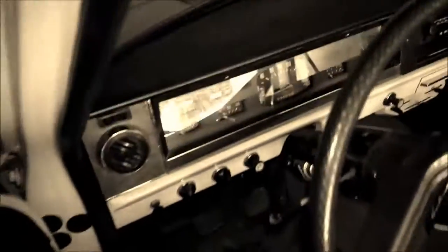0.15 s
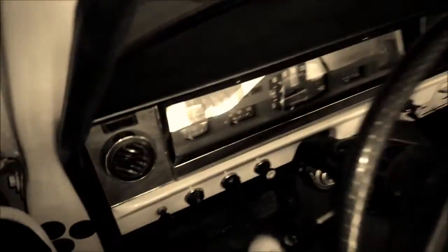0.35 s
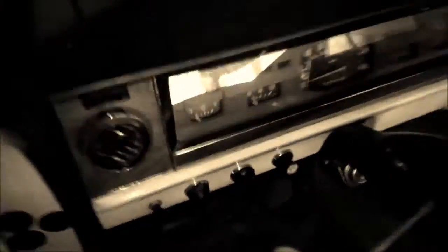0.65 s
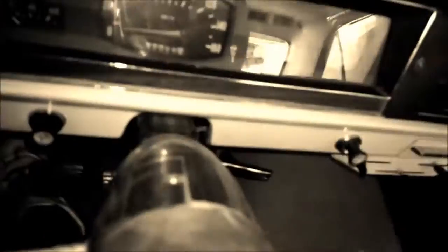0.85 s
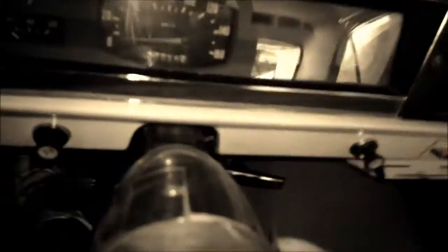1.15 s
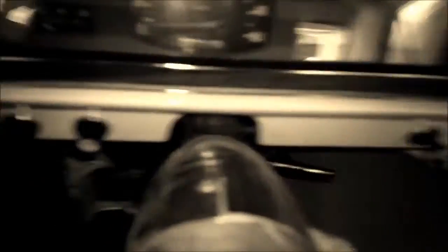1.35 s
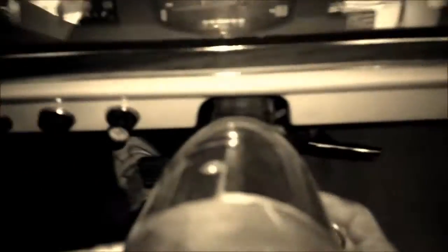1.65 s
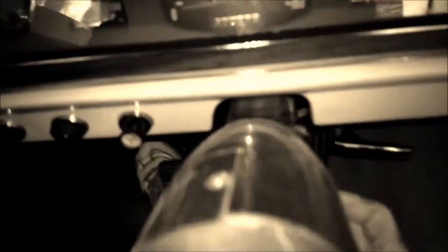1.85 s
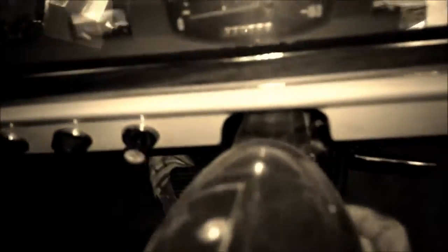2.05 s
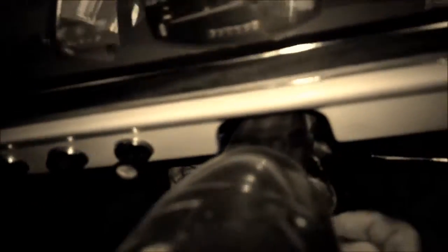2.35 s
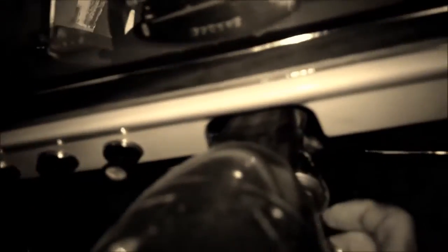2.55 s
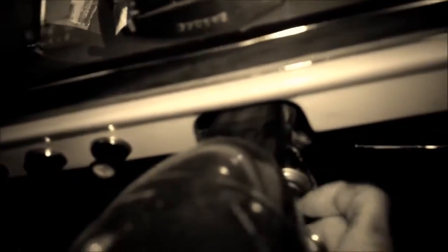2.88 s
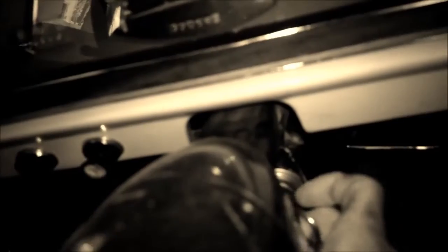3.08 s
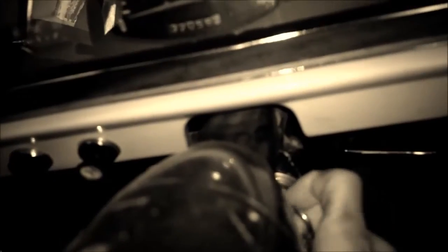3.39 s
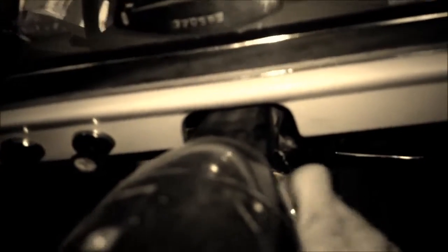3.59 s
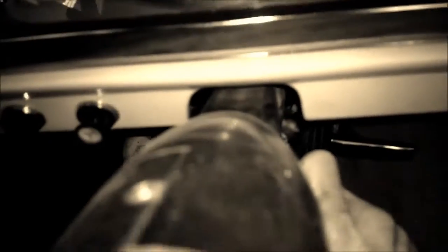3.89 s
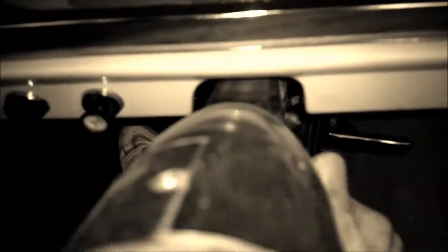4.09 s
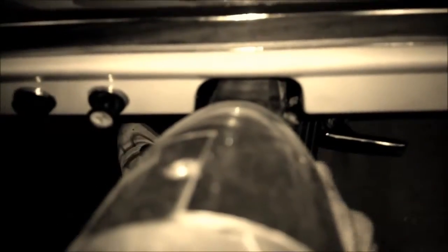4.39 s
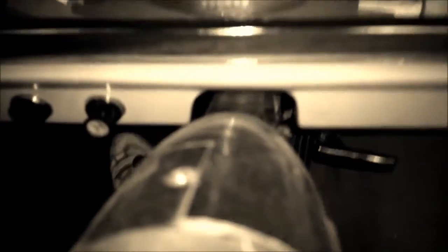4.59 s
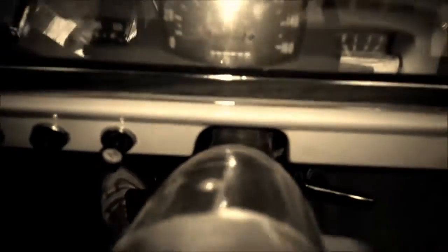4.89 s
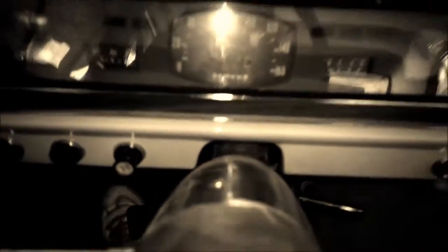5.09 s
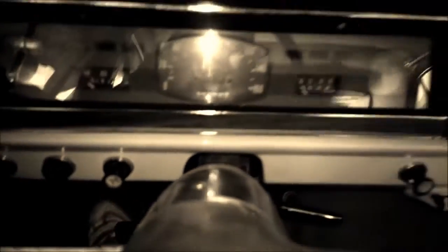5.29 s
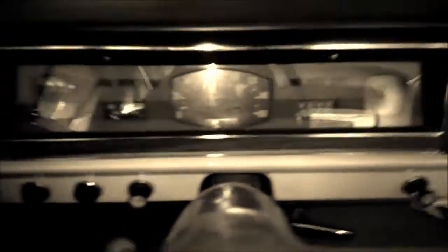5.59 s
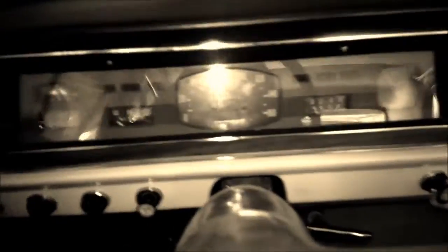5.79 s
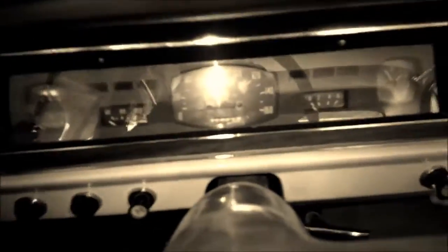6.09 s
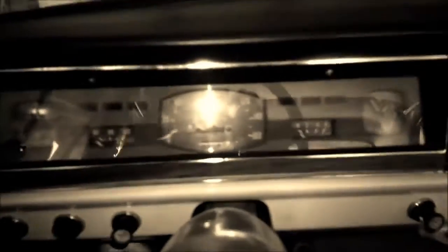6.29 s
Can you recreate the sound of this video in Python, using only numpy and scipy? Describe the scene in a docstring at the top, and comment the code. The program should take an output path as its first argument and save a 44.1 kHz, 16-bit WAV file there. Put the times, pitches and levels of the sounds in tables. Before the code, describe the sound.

Inside a quiet parked car, fingers bump the microphone, a key slides into the ignition with sharp clicks, and keys jingle.

```python
"""Inside a parked car, engine off, heard by a hand-held camera: left port open, right port muffled.
First fingers rub and bump the camera and the background dips briefly; the lens drive ticks faintly.
From 1.3 s a sleeve rustles and a hand finds the ignition key with small metal taps. At 3.4 s the key
slides into the lock, clicking over its pins; the dashboard knocks and the steering column thuds. From
4.5 s the lock clicks again and the hanging keys jangle. At 6 s the camera is rubbed and bumped again."""
import sys
import numpy as np
from scipy import signal
from scipy.fft import rfft, irfft
from scipy.io import wavfile

SR = 44100
rng = np.random.default_rng(int(sys.argv[2]) if len(sys.argv) > 2 else 0)


def int16_out(signal):
    """Quantize to a 16-bit WAV file."""
    q = np.round(np.clip(np.atleast_2d(signal).T, -1, 1) * 32767)
    wavfile.write(sys.argv[1], SR, q.astype(np.int16))


N = 284170
TIME = np.arange(N) / SR
AGE = TIME[:SR // 4]   # seconds since a contact
GRID_HZ = np.maximum(np.fft.rfftfreq(8192, 1 / SR), 1)


def from_db(db):
    """Amplitude ratio of a level in decibels."""
    return 10 ** (np.asarray(db) / 20)


def add(track, start_s, sound):
    """Superposition: a sound joins the track at its start time."""
    start = max(round(start_s * SR), 0)
    track[..., start:start + sound.shape[-1]] += sound[..., :N - start]


def resonance_db(centre_hz, width_hz, peak_db):
    """Resonance: a bell-shaped peak in a spectrum."""
    return peak_db / (1 + (2 * (GRID_HZ - centre_hz) / width_hz) ** 2)


def response_db(spectrum, modes=()):
    """Frequency response: a broad spectrum with resonances standing on it."""
    hz, db = np.transpose(spectrum)
    return np.interp(np.log(GRID_HZ), np.log(hz), db) + sum(resonance_db(*mode) for mode in modes)


def contact_db(body_db, tilt_db_per_octave, ring_hz, ring_width_hz, ring_db):
    """Impact spectrum: a harder contact is brighter, and the struck part resonates."""
    brightness_db = tilt_db_per_octave * np.log2(np.maximum(GRID_HZ, 1500))
    return body_db + brightness_db + resonance_db(ring_hz, ring_width_hz, ring_db)


def impulse(gain_db):
    """Minimum phase: folding the cepstrum gives a causal impulse response."""
    cepstrum = irfft(np.log(from_db(gain_db)))
    half = len(cepstrum) // 2
    cepstrum[1:half] *= 2
    cepstrum[half + 1:] = 0
    return irfft(np.exp(rfft(cepstrum)))[:half]


def colour(source, shape_db):
    """Convolution at unit energy: white noise takes the spectral shape and keeps its power."""
    response = impulse(shape_db)
    return signal.oaconvolve(source, response / np.linalg.norm(response))[:len(source)]


def noise(spectrum):
    """Stationary noise of rms 1 with the given spectral shape."""
    return colour(rng.standard_normal(N + SR), response_db(spectrum))[SR:]


def friction(spectrum, grain_db, grains_per_s):
    """Stick-slip friction: noise that comes in grains of bounded strength."""
    knots = np.sqrt(3) * rng.uniform(-1, 1, N)   # unit variance
    grain = from_db(grain_db * np.interp(TIME * grains_per_s, np.arange(N), knots))
    excitation = rng.standard_normal(N) * grain / np.sqrt(np.mean(grain ** 2))
    return colour(excitation, response_db(spectrum))


def burst(decay_s, tail_db, tail_s, rise_s):
    """Exponential decay: a spray of tiny contacts, then the padded cabin's short reverberation."""
    envelope = np.hypot(np.exp(-AGE / decay_s), from_db(tail_db) * np.exp(-AGE / tail_s))
    return rng.standard_normal(len(AGE)) * envelope * (1 - np.exp(-AGE / rise_s))


def stroke(start_s, hold_s, level_db, rise_db_per_s, fall_db_per_s):
    """Envelope of one movement: it swells up to its start time, holds and fades."""
    early_s = np.maximum(start_s - TIME, 0)
    late_s = np.maximum(TIME - start_s - hold_s, 0)
    return from_db(np.maximum(level_db - rise_db_per_s * early_s - fall_db_per_s * late_s, -200))


def strokes(rows, rise_db_per_s, fall_db_per_s):
    """Incoherent addition: the envelopes of several movements sum in power."""
    return np.sqrt(sum(stroke(*row, rise_db_per_s, fall_db_per_s) ** 2 for row in rows))


# right port relative to left: frequency_hz, gain_db
MUFFLED_PORT = [(30, 4.5), (200, -1), (450, 3.5), (750, 6), (1200, -5), (2000, -31.5), (3000, -39),
                (6000, -40.5), (9000, -45), (16000, -38)]

def ports(sound, lag_s=0.00045):
    """Delay and filtering: cabin sound reaches the right port late and dull."""
    dull = signal.oaconvolve(sound, impulse(response_db(MUFFLED_PORT)))[:N]
    return np.array([sound, np.interp(TIME - lag_s, TIME, dull)])


# murmur's bass and middle, hum, microphone hiss: frequency_hz, relative_db
BASS_SPECTRUM = [(12, -36), (20, -2), (64, 1), (91, 2.5), (124, 1), (242, -8.5), (300, -10), (390, -26),
                 (660, -120)]
MIDDLE_SPECTRUM = [(120, -7), (280, -1), (450, -3), (750, -6.5), (1300, -17.5), (2200, -21), (5000, -45.5),
                   (16000, -62)]
HUM_SPECTRUM = [(100, -45.5), (255, -22), (282, -3), (310, -18), (800, -54.5)]
HISS_SPECTRUM = [(500, -7), (1400, -5), (2000, -4.5), (2700, -6.5), (3600, -5.5), (5500, -7.5), (7500, -12),
                 (16000, -11)]
# bass swells as the driver moves, and spells of faint hum: start_s, hold_s, level_db
SWELLS = [(3.22, 0.11, -66), (3.55, 0.096, -55.5), (4.6, 0.039, -55), (5.1, 0.32, -61.5),
          (5.72, 0.033, -58.5)]
HUMS = [(1.36, 0.14, -69.5), (5.08, 0.37, -70)]

def cabin(bass_db=-66.5, middle_db=-71.5, hiss_db=-73.5):
    """Ambient noise: both ports share the bass and hum; middle and hiss are uncorrelated."""
    slopes = dict(rise_db_per_s=108, fall_db_per_s=97.5)
    bass_gain = np.hypot(from_db(bass_db), strokes(SWELLS, **slopes))
    bass = bass_gain * friction(BASS_SPECTRUM, grain_db=1.5, grains_per_s=12)
    hum = strokes(HUMS, **slopes) * noise(HUM_SPECTRUM)
    diffuse = [from_db(middle_db) * noise(MIDDLE_SPECTRUM) + from_db(hiss_db) * noise(HISS_SPECTRUM)
               for side in range(2)]
    return ports(bass + hum) + np.array(diffuse)


# rubbing cloth: frequency_hz, relative_db
SLEEVE_SPECTRUM = [(470, -25.5), (800, -17), (1000, -10.5), (1300, -10), (3260, -12.5), (4030, -13.5),
                   (6330, -14.5), (9690, -21.5), (15000, -28.5), (16000, -32)]
# arm movements: start_s, hold_s, level_db, tilt_db_per_octave
RUSTLES = [(1.285, 0.39, -66.5, 1.5), (1.771, 0.094, -66, -6.5), (2.018, 0.076, -67.5, -2),
           (2.17, 0.15, -69, 0), (2.664, 0.28, -72, -1), (2.964, 0.47, -70.5, 0), (3.68, 0.21, -64, 0),
           (4.1, 0.052, -70.5, -5.5), (4.45, 0.83, -70.5, -0.5), (5.148, 0.27, -63.5, 1),
           (5.676, 0.21, -69.5, 0), (5.978, 0.57, -63, -2.5)]

def sleeve():
    """Cloth friction: each move of the arm rustles, heard at the open port only."""
    left = np.zeros(N)
    for start_s, hold_s, level_db, tilt in RUSTLES:
        spectrum = [(hz, db + tilt * np.log2(hz)) for hz, db in SLEEVE_SPECTRUM]
        cloth = friction(spectrum, grain_db=2, grains_per_s=70)
        left += stroke(start_s, hold_s, level_db, rise_db_per_s=130, fall_db_per_s=118) * cloth
    return np.array([left, np.zeros(N)])


# runs of the lens drive: start_s, step_count, right_peak_db
LENS_RUNS = [(0.592, 2, -52.5), (1.302, 1, -53), (1.526, 2, -55), (1.932, 1, -53.5), (2.094, 1, -50.5),
             (2.430, 3, -49), (2.895, 2, -48.5), (2.969, 1, -49), (3.126, 3, -49), (3.528, 5, -48),
             (5.225, 2, -51.5), (5.460, 4, -56.5)]

def lens_ticks(step_s=0.1, tick_hz=720, peak_s=0.0034, scatter_db=1.0, left_db=-14):
    """Transient response: each step of the lens drive swings the camera case for a few cycles."""
    out = np.zeros(N)
    for start_s, count, peak_db in LENS_RUNS:
        for step in range(round(count)):
            pitch, length, strength = rng.standard_normal(3)
            age = AGE / (peak_s * np.exp(0.15 * length))
            envelope = (age * np.exp(1 - age)) ** 2
            tick = envelope * np.sin(2 * np.pi * tick_hz * (1 + 0.02 * pitch) * AGE)
            add(out, start_s + step * step_s, from_db(peak_db + scatter_db * strength) * tick)
    return out * from_db([[left_db], [0]])


# rumble of the camera case: frequency_hz, relative_db
GRIP_SPECTRUM = [(12, -0.5), (28, 2), (70, 5), (130, -17), (250, -25), (600, -45.5), (2000, -62.5),
                 (16000, -89)]
# shifts of the grip: start_s, hold_s, right_db, left_minus_right_db
GRIPS = [(0.0, 0.072, -40, 5.5), (0.102, 0.13, -36, -7.5), (0.289, 0.049, -42.5, -15),
         (0.473, 0.38, -48, -12.5), (0.78, 0.035, -34.5, -18.5), (5.974, 0.26, -50, -14),
         (6.387, 0.03, -37.5, -20)]

def grip():
    """Structure-borne sound: the shifting grip rumbles through the case, mostly on the right."""
    left = [(start_s, hold_s, db + pan_db) for start_s, hold_s, db, pan_db in GRIPS]
    right = [(start_s, hold_s, db) for start_s, hold_s, db, _ in GRIPS]
    gains = [strokes(side, rise_db_per_s=409, fall_db_per_s=191.5) for side in (left, right)]
    return np.array(gains) * noise(GRIP_SPECTRUM)


# hiss and sizzle of sliding skin: frequency_hz, relative_db
SLIDE_SPECTRUM = [(300, -10), (800, -7.5), (1600, -5.5), (3000, -5), (5000, -1), (7300, -1.5),
                  (9500, -11.5), (12000, -18.5), (16000, -20)]
SIZZLE_SPECTRUM = [(1000, -24.5), (5000, -5.5), (9000, 0), (11000, 0), (14500, 1), (16000, -2)]
# slides by the left port: start_s, hold_s, hiss_db, sizzle_db
SLIDES = [(0.0, 0.8, -67, -80), (0.187, 0.07, -53, -48), (0.792, 0.09, -51.5, -55.5)]

def slide(end_s=0.868, rise_db_per_s=121, fall_db_per_s=47, steepness=1.73):
    """Sliding friction: skin hisses by the open port; its sizzle grows more steeply with speed."""
    hiss_rows = [(start_s, hold_s, db) for start_s, hold_s, db, _ in SLIDES]
    sizzle_rows = [(start_s, hold_s, db) for start_s, hold_s, _, db in SLIDES]
    hiss = strokes(hiss_rows, rise_db_per_s, fall_db_per_s)
    hiss *= friction(SLIDE_SPECTRUM, grain_db=2.1, grains_per_s=1400)
    sizzle = strokes(sizzle_rows, steepness * rise_db_per_s, steepness * fall_db_per_s)
    sizzle *= noise(SIZZLE_SPECTRUM)
    return np.array([(hiss + sizzle) * (TIME < end_s), np.zeros(N)])


# finger drag at each port: frequency_hz, relative_db
DRAG_LEFT_SPECTRUM = [(60, -5), (150, -8), (400, 3), (900, -2.5), (1500, -12), (2200, -4), (4500, -10.5),
                      (7000, -18), (9500, -27.5), (12000, -21.5), (15500, -19.5)]
DRAG_RIGHT_SPECTRUM = [(60, 2), (150, 4.5), (400, -8), (780, 1), (1200, -21), (2200, -26.5), (4000, -40.5),
                       (8000, -68), (16000, -42.5)]
# jerks of the finger: start_s, hold_s, left_db
SLIPS = [(0.868, 0.003, -25.5), (0.883, 0.0035, -26.5), (0.911, 0.015, -30)]

def drag(lift_s=0.93, lift_db=-10.5, right_gain_db=4.5):
    """Stick-slip motion: a finger jerks across both ports; the level drops as it lifts off."""
    gain = strokes(SLIPS, rise_db_per_s=14000.5, fall_db_per_s=477) * from_db(lift_db * (TIME > lift_s))
    left = friction(DRAG_LEFT_SPECTRUM, grain_db=2.5, grains_per_s=700)
    right = from_db(right_gain_db) * friction(DRAG_RIGHT_SPECTRUM, grain_db=5, grains_per_s=600)
    return gain * np.array([left, right])


# skin on the right port: frequency_hz, relative_db
RUB_SPECTRUM = [(150, -6), (450, -8.5), (700, -3), (1000, -6.5), (1300, -12.5), (2000, -16), (2900, -38),
                (4500, -37.5), (7000, -49), (16000, -50)]
# rubs: start_s, hold_s, right_db
RUBS = [(6.0, 0.078, -61), (6.158, 0.057, -46), (6.285, 0.096, -46), (6.312, 0.011, -38.5),
        (6.43, 0.02, -41)]

def rub(left_db=-26):
    """Skin friction: a dull rasp at the muffled port, faint at the open one."""
    rasp = friction(RUB_SPECTRUM, grain_db=2.5, grains_per_s=350)
    return strokes(RUBS, rise_db_per_s=601, fall_db_per_s=550) * rasp * from_db([[left_db], [0]])


def dip(start_s=0.93, fall_s=0.044, hold_s=0.059, recovery_s=0.093, depth_db=-32):
    """Amplitude envelope: after the drag the background drops away briefly and creeps back."""
    age = TIME - start_s
    fall = np.clip(age / fall_s, 0, 1)
    release = np.exp(-np.maximum(age - hold_s, 0) / recovery_s)
    return from_db(depth_db * fall * release)


# fingers bumping the camera: start_s, right_gain_db, settled_pitch_hz, decay_s, left_minus_right_db
BUMPS = [(0.016, -41, 115, 0.063, 0.5), (0.4414, -39, 90, 0.0034, -20), (0.781, -7.5, 39.8, 0.0036, -35),
         (.8682, -19.5, 565, 0.0028, -3.5), (0.8817, -14.5, 122.6, 0.0083, -1.5),
         (0.9105, -11, 127, 0.0051, 1.5), (6.01, -32, 59.7, 0.013, -13), (6.030, -13.5, 60.7, 0.014, -25),
         (6.037, -32, 556, 0.0043, -27), (6.132, -32, 41, 0.025, -23), (6.142, -41.5, 976, 0.015, -33),
         (6.156, -29.5, 43.4, 0.032, -32), (6.2891, -8.5, 67, 0.0047, -32), (6.29, -34, 623, 0.0068, -34),
         (6.3755, -35, 716, 0.014, -28), (6.399, -20.5, 329, 0.004, -40)]

def bumps(stiffness=2.9, settle_s=0.00078, rise_s=0.00073):
    """Damped oscillation: a fingertip lands stiffly and yields, so the pressure swing slows."""
    out = np.zeros((2, N))
    for start_s, db, pitch_hz, decay_s, pan_db in BUMPS:
        cycles = pitch_hz * (AGE + stiffness * settle_s * (1 - np.exp(-AGE / settle_s)))
        envelope = np.exp(-AGE / decay_s) * (1 - np.exp(-AGE / rise_s))
        swing = -np.sin(2 * np.pi * cycles) * envelope
        add(out, start_s, swing * from_db([[db + pan_db], [db]]))
    return out


# hollow column shroud: frequency_hz, relative_db
SCUFF_SPECTRUM = [(60, -22), (200, 0), (350, -2), (580, -0.5), (800, -12), (1100, -21), (1600, -27),
                  (3000, -39), (16000, -86)]
# hand scuffing the shroud: start_s, right_db, decay_s, left_minus_right_db
SCUFFS = [(1.806, -53, 0.043, -13), (1.838, -49, 0.038, -25), (2.075, -51.5, 0.017, -21),
          (4.045, -61.5, 0.07, -1.5), (4.233, -45.5, 0.022, -11), (4.530, -61, 0.056, 12.5),
          (4.773, -54.5, 0.024, 4), (5.375, -53.5, 0.021, 3.5), (5.68, -58, 0.051, -4)]

def scuffs():
    """Diffuse field: hollow scuffs fill the footwell and reach each port by paths of their own."""
    out, shroud_db = np.zeros((2, N)), response_db(SCUFF_SPECTRUM)
    for start_s, db, decay_s, pan_db in SCUFFS:
        sides = [colour(burst(decay_s, tail_db=-35, tail_s=0.037, rise_s=0.002), shroud_db)
                 for side in range(2)]
        add(out, start_s, from_db([[db + pan_db], [db]]) * sides)
    return out


# thuds of the steering column: start_s, peak_db, pitch_hz
THUDS = [(1.236, -53, 148.6), (2.281, -57.5, 65), (3.215, -55.5, 70), (3.429, -43, 86.5),
         (3.479, -27.5, 63), (3.482, -34.5, 135.5), (3.504, -27, 120.5), (3.536, -32.5, 128),
         (3.582, -34, 58), (4.233, -36.5, 110), (4.577, -46.5, 74), (5.949, -43.5, 66)]

def column(cycles_to_peak=1.3):
    """Damped vibration: shaken by the hand, the heavy column swells and fades, slower at low pitch."""
    out = np.zeros(N)
    for start_s, peak_db, pitch_hz in THUDS:
        age = AGE * pitch_hz / cycles_to_peak
        envelope = (age * np.exp(1 - age)) ** 1.2
        add(out, start_s, from_db(peak_db) * envelope * np.sin(2 * np.pi * pitch_hz * AGE))
    return out


# tapped metal: frequency_hz, relative_db
TAP_SPECTRUM = [(200, -11), (1500, -10.5), (2400, -21), (3800, -10), (6000, -7), (8500, -12),
                (11000, -19.5), (16000, -24.5)]
# its resonances: centre_hz, width_hz, peak_db
TAP_MODES = [(2930, 120, 15.5), (3940, 470, 12), (4740, 380, 4), (7800, 640, 4.5)]
# key and fingers tapping about the lock: start_s, level_db, decay_s, tilt_db_per_octave, ring_hz
TAPS = [(1.408, -57.5, 0.014, 5.5, 3870), (1.633, -35, 0.0041, 4, 4640), (1.658, -56.5, 0.017, -6, 7850),
        (1.77, -50.5, 0.012, 2, 3370), (1.831, -46.5, 0.0043, -1, 2950), (1.837, -42, 0.013, -1.5, 3220),
        (2.055, -43, 0.012, -2, 3960), (2.077, -48.5, 0.011, -1, 7100), (2.252, -58.5, 0.012, 7, 5200),
        (2.27, -49, 0.0072, 18, 6450), (2.285, -57, 0.022, 7.5, 5700), (2.61, -66, 0.009, 4, 3500),
        (2.873, -60, 0.012, -5, 3880), (3.581, -59, 0.018, 0, 2760), (4.123, -58, 0.006, -7.5, 3200),
        (5.872, -55, 0.0073, -4, 3400)]

def taps():
    """Damped impacts: the metal rings only briefly while the fingers hold the key."""
    out, body_db = np.zeros(N), response_db(TAP_SPECTRUM, TAP_MODES)
    for start_s, level_db, decay_s, tilt, ring_hz in TAPS:
        spray = burst(decay_s, tail_db=-19, tail_s=0.015, rise_s=0.00015)
        tap = colour(spray, contact_db(body_db, tilt, ring_hz, ring_width_hz=520, ring_db=9.5))
        add(out, start_s, from_db(level_db) * tap)
    return out


# key blade on the lock: frequency_hz, relative_db
SCRAPE_SPECTRUM = [(1200, -34.5), (2000, 10), (2800, 0), (4000, -5.5), (16000, -19)]
# scrapes: start_s, hold_s, level_db
SCRAPES = [(3.423, 0.035, -51), (3.465, 0.04, -43)]

def blade():
    """Sliding friction: the key blade rasps between the pins, harder as it goes in."""
    gain = strokes(SCRAPES, rise_db_per_s=1498.5, fall_db_per_s=506)
    return gain * friction(SCRAPE_SPECTRUM, grain_db=0, grains_per_s=600)


# natural modes of the keys, and their scratch on each other: frequency_hz, relative_db
KEY_MODES = [(3700, -9.5), (5615, -8.5), (6783, -2.5), (6960, -12), (7682, -11), (8242, -2), (9324, -2.5),
             (10487, 2.5), (11558, 0.5), (11630, 0), (12060, 6.5), (12290, -17.5), (12845, 6), (14490, -6),
             (15665, -1.5)]
SCRATCH_SPECTRUM = [(300, -48), (2000, -1.5), (5000, -6), (7000, 3), (9500, -9), (12000, -3), (14000, -7),
                    (16000, 4.5)]
# hanging keys touching: start_s, level_db, struck_hz, t60_s, scratch_relative_db
JINGLES = [(4.558, -34.5, 10490, 0.1, -3), (4.8955, -32.5, 9324, 0.086, -7.5),
           (4.917, -39.5, 12060, 0.04, -17), (4.9362, -29.5, 12060, 0.03, -20),
           (5.141, -43, 8240, 0.096, 3), (5.154, -42.5, 11600, 0.09, -1), (5.258, -46, 12300, 0.17, 7),
           (5.273, -44, 9324, 0.18, -1), (5.331, -34.5, 11600, 0.063, -6), (5.341, -37.5, 10490, 0.11, -20),
           (5.374, -37.5, 11600, 0.074, -22), (5.388, -33, 12845, 0.086, -32),
           (5.433, -49.5, 11600, 0.059, -4), (5.51, -56, 11600, 0.059, -10)]

def keys(focus_hz=260, others_db=-9, scatter_db=3, detune=0.011, rebound_s=0.0049, rebound_db=-5):
    """Modal vibration: a touch scratches briefly and rings all keys, the struck one most."""
    out, scratch_shape_db = np.zeros(N), response_db(SCRATCH_SPECTRUM)
    mode_hz, mode_db = np.transpose(KEY_MODES)[:, :, None]
    attack = 1 - np.exp(-AGE / 0.0006)
    for start_s, level_db, struck_hz, t60_s, scratch_db in JINGLES:
        chance, pitch, phase = rng.standard_normal((3, len(mode_hz), 1))
        struck = np.exp(-((mode_hz - struck_hz) / focus_hz) ** 2)
        strength = from_db(mode_db + (others_db + scatter_db * chance) * (0.5 - struck))
        # loosely touching keys pull each other slightly out of tune
        detuned_hz = mode_hz * (1 + detune * pitch * (1 - struck))
        partials = np.sin(2 * np.pi * (detuned_hz * AGE + phase)) * from_db(-60 * AGE / t60_s)
        ring = (strength * partials).sum(axis=0) / np.linalg.norm(strength) * attack
        # three quick rebounds recolour the clink; its energy is kept
        clink = ring.copy()
        delays_s = np.cumsum(rebound_s * (0.5 + rng.random(size=3)))
        for bounce, delay_s in enumerate(delays_s, start=1):
            clink += from_db(rebound_db * bounce) * np.pad(ring, (round(delay_s * SR), 0))[:len(AGE)]
        clink *= np.linalg.norm(ring) / np.linalg.norm(clink)
        scratch = colour(burst(0.0027, tail_db=-9.5, tail_s=0.032, rise_s=0.0011), scratch_shape_db)
        add(out, start_s, from_db(level_db) * (clink + from_db(scratch_db) * scratch))
    return out


# lock barrel and dashboard: frequency_hz, relative_db
BARREL_SPECTRUM = [(200, -25), (1100, -33), (1900, -3), (3000, 3.5), (4300, -4), (5200, -0.5), (7500, -7),
                   (9500, -11.5), (12500, -7.5), (16000, -13.5)]
DASH_SPECTRUM = [(60, -11.5), (220, -0.5), (400, -7.5), (620, -2), (900, -21), (1600, -3), (3000, -29.5),
                 (16000, -66)]
# barrel resonances: centre_hz, width_hz, peak_db
BARREL_MODES = [(2602, 170, 10), (3370, 140, 6.5), (4950, 300, 2), (7400, 460, 10), (14770, 900, -1)]
# pins and latch: start_s, level_db, decay_s, tilt_db_per_octave, ring_hz, knock_relative_db
LOCK_CLICKS = [(3.414, -25.5, 0.0011, 9.5, 2080, -28), (3.4384, -26, 0.0018, 8, 1980, -29),
               (3.4618, -26, 0.006, 6, 2120, -27), (3.481, -23.5, 0.007, 7, 2600, -21),
               (3.496, -20, 0.009, 1, 3640, -24.5), (3.5001, -9, 0.0027, 1, 2800, -25),
               (3.506, -33, 0.0067, -14, 1870, -8.5), (4.232, -48.5, 0.0051, -12.5, 2000, -5.5),
               (4.244, -57.5, 0.011, -11, 2130, -3), (4.407, -45, 0.011, -2, 2730, -19.5),
               (4.466, -57, 0.015, -12, 2800, -29), (4.502, -30, 0.00061, 0, 3360, -25),
               (4.528, -20.5, 0.0051, 4, 2940, -15), (4.53, -32, 0.0033, 31, 4700, -18),
               (4.538, -36.5, 0.019, 4, 2870, -7), (4.551, -26.5, 0.0041, 0.5, 3320, -16),
               (4.559, -34.5, 0.0063, -19, 1210, -9), (4.611, -42, 0.0052, 8.5, 2850, -18),
               (4.77, -41, 0.0059, 2, 2580, -30.5), (4.787, -50.5, 0.011, 0, 2670, -24),
               (5.3725, -35.5, 0.0068, 0, 2360, -17), (5.391, -36.5, 0.0011, -8, 3720, -27),
               (5.424, -53.5, 0.021, -16, 2700, -9)]

def lock():
    """Impact excitation: pins and latch snap against the barrel, which rings and knocks the dashboard."""
    out = np.zeros(N)
    barrel_db, dash_db = response_db(BARREL_SPECTRUM, BARREL_MODES), response_db(DASH_SPECTRUM)
    for start_s, level_db, decay_s, tilt, ring_hz, knock_db in LOCK_CLICKS:
        spray = burst(decay_s, tail_db=-10, tail_s=0.009, rise_s=0.0004)
        snap = colour(spray, contact_db(barrel_db, tilt, ring_hz, ring_width_hz=450, ring_db=8.5))
        knock = colour(burst(0.017, tail_db=-14, tail_s=0.02, rise_s=0.0017), dash_db)
        add(out, start_s, from_db(level_db) * (snap + from_db(knock_db) * knock))
    return out


def scene():
    """Superposition: lock and keys reach the two ports over the noises of camera and cabin."""
    ignition = ports(taps() + blade() + lock() + keys() + column())
    contacts = scuffs() + lens_ticks() + bumps()
    background = grip() + rub() + slide() + drag() + sleeve() + cabin()
    return ignition + contacts + dip() * background


def record(dry):
    """Band limiting: a steep elliptic low-pass cuts the highest treble."""
    cutoff_hz = 15950
    return signal.sosfilt(signal.ellip(12, 0.2, 80, cutoff_hz, fs=SR, output="sos"), dry)


dry = scene()
out = record(dry)
int16_out(out)
```